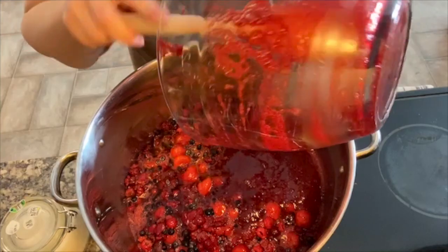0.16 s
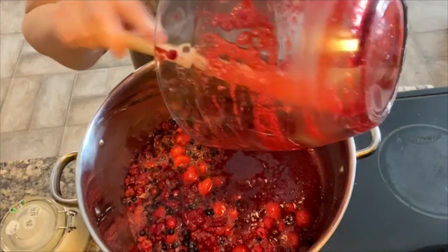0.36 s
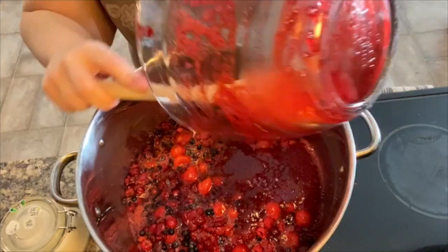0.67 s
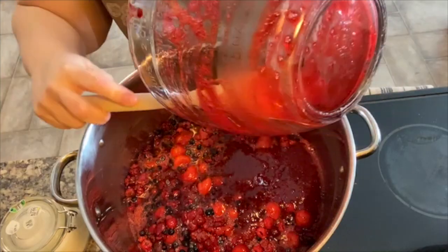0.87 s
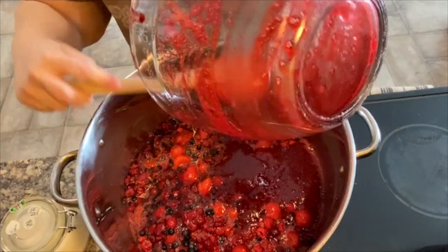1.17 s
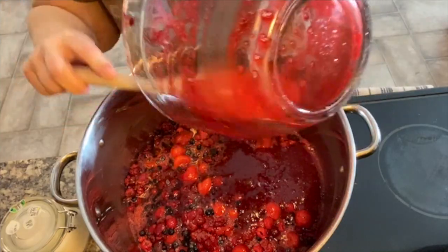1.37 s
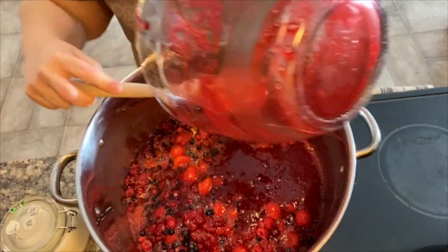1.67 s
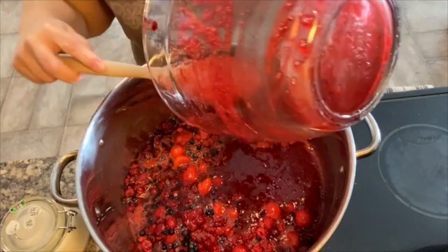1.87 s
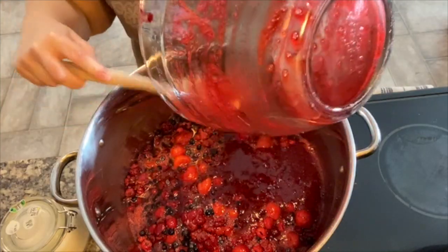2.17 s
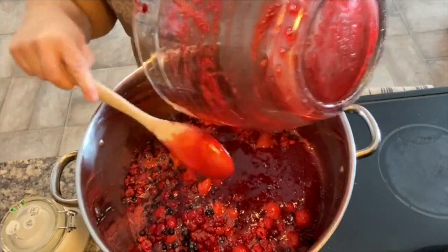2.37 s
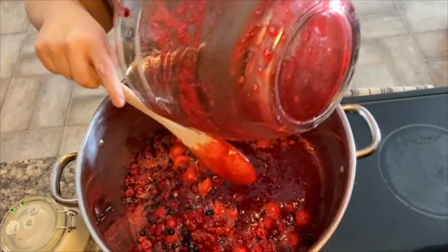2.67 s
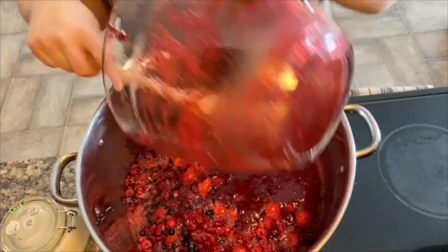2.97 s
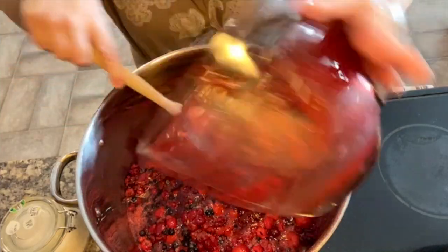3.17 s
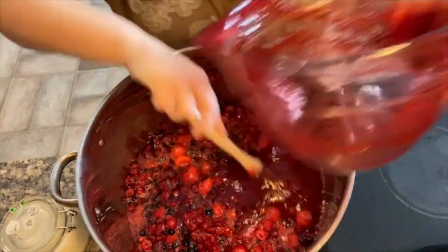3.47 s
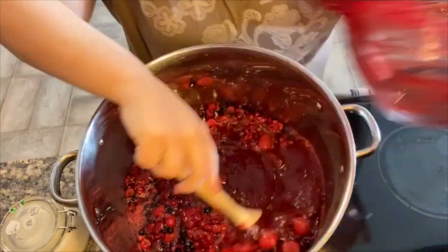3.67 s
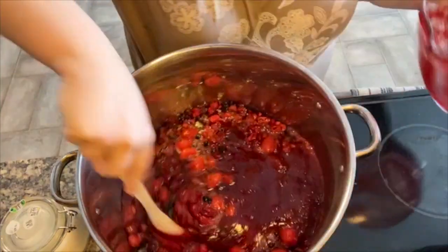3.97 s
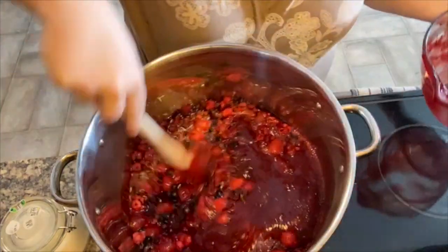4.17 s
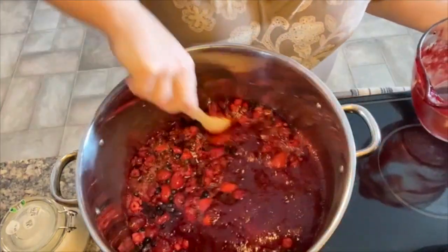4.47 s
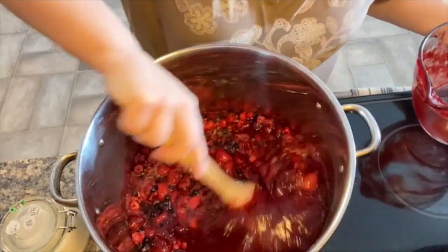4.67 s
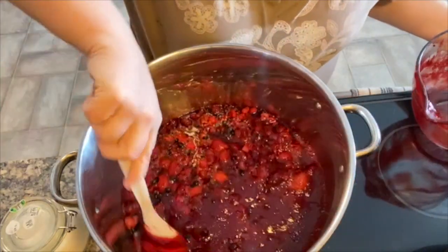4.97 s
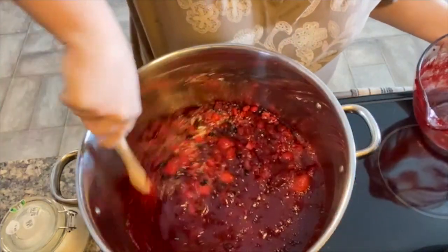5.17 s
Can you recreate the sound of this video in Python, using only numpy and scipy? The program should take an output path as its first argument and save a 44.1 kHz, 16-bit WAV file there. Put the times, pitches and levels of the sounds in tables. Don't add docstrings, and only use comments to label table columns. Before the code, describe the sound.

In a home kitchen with a low fridge hum and soft air noise, a wooden spoon scrapes a glass bowl in short jerky squeaks and knocks it sharply, loudest early on. Lighter rim knocks follow, then a short pause before the spoon enters a full steel pot, sweeping and thudding dully through wet fruit. Close stereo microphone, faint room echo.

```python
import sys
import numpy as np
from scipy import signal
from scipy.io import wavfile

SR = 44100
rng = np.random.default_rng(int(sys.argv[2]) if len(sys.argv) > 2 else 0)


def volts_from_decibels(level):
    exponent = np.asarray(level, float) / 20
    return 10 ** exponent


def transcribe(u):
    v = np.clip(np.atleast_2d(u).T, -1, 1)
    q = np.round(v * 32767).astype(np.int16)
    wavfile.write(sys.argv[1], SR, q)


N = 235048

# pitch_hz, level_db (per Hz)
AIR_COLOUR = [(15, -42), (30, -14), (55, -3), (90, 1), (150, -8.5), (290, -11), (400, -25.5), (600, -13.5),
              (730, -14.5), (1350, -22), (1700, -25), (2700, -25.5), (4500, -58), (9000, -43), (16000, -61)]
# pitch_hz, width_hz, level_db
FRIDGE_FAN = [(139, 22, -67.5), (543.4, 80, -62), (619.8, 23, -60.5), (1322, 230, -68)]
# pitch_hz, level_db (rms)
FRIDGE_MOTOR = [(60, -68), (118.6, -51.5)]
# pitch_hz, likeness (-1 to 1)
PORT_LIKENESS = [(60, 0.66), (180, 1), (530, -0.68), (1590, -0.23), (4730, -0.084), (14100, 0.49)]
# pitch_hz, level_db
PORT_LEANING = [(60, -1.5), (180, 5), (530, 1), (1590, -1), (4730, -2), (14100, 0.5)]
# pitch_hz, t60_s
ECHO_DECAY = [(150, 0.17), (600, 0.39), (2000, 0.37), (5000, 0.41), (12000, 0.14)]
# low_hz, high_hz
DEAF_BAND = [9750, 11050]
# pitch_hz, level_db (per Hz)
RUSTLE_SPECTRUM = [(900, -17), (2000, 11.5), (3500, 1.5), (5500, 3), (8000, -5.5), (12000, 7.5),
                   (15000, -15)]
# start_s, length_s, level_db
PULP_STROKES = [(0.0, 0.0095, -73), (0.263, 0.32, -79), (0.734, 0.11, -84), (1.017, 0.026, -82.5),
                (1.461, 0.23, -83), (2.057, 0.08, -89), (2.26, 0.03, -78), (2.946, 0.032, -79.5),
                (3.15, 0.064, -97), (3.31, 0.43, -73.5), (3.903, 0.32, -72), (4.45, 0.11, -74.5),
                (4.738, 0.29, -75.5), (5.123, 0.25, -73)]
# start_s, peak_db, pitch_hz
PULP_TICKS = [(0.0488, -49, 8300), (0.2137, -21, 9000), (0.647, -52.5, 4100), (1.078, -54, 2800),
              (1.2353, -55, 8360), (1.584, -60, 7430), (1.6013, -62, 3510), (1.919, -56.5, 8590),
              (1.9622, -49.5, 8000), (1.9807, -42.5, 10100), (2.0271, -33, 8700), (2.607, -52.5, 7700),
              (3.1143, -58.5, 13600), (3.6771, -38.5, 3500), (3.7278, -45.5, 4300), (4.251, -58, 3440),
              (4.6014, -54.5, 12100), (4.6394, -58, 8430), (4.7308, -40.5, 8200), (4.828, -59, 4900),
              (4.954, -38, 7920), (5.0574, -55, 5450), (5.0946, -46, 12100), (5.1152, -48.5, 8250),
              (5.181, -37, 8000), (5.299, -49, 7860)]
# start_s, peak_db, pitch_hz
PULP_PEELS = [
    (0.1462, -45, 7000),
    (1.739, -59.5, 8000),
    (2.2083, -55, 6800),
    (3.293, -48, 7420),
    (3.3478, -53, 3520),
    (4.4166, -55, 3640),
]
# start_s, peak_db, pitch_hz
WOOD_TAPS = [(0.147, -65, 1500), (1.601, -38, 1700), (1.641, -40, 2600), (1.66, -39.5, 2460),
             (1.994, -40, 1840), (4.456, -33, 2200), (4.512, -39, 1830), (4.774, -34.5, 1490),
             (4.901, -36, 1410), (4.954, -49, 2600), (5.216, -27, 1500)]
# start_s, length_s, level_db
POT_SWEEPS = [
    (3.451, 0.21, -58.5),
    (3.958, 0.24, -61.5),
]
# start_hz, end_hz, width_hz, level_db
SWEEP_VOICES = [
    [(2167, 1950, 210, 1), (1643, 1850, 70, -3.5), (3100, 2950, 96, -7.5), (2600, 2600, 62, -12),
     (4300, 4300, 300, -12)],
    [(1640, 1540, 110, -1.5), (2200, 2250, 117, -3), (3400, 3600, 47, -13), (3060, 2200, 110, -25)],
]
# start_s, held_s, level_db
GLASS_JERKS = [
    (0.005, 0.02, -52),
    (0.078, 0.01, -66),
    (0.585, 0.03, -49),
    (0.73, 0.02, -58),
    (0.79, 0.02, -61),
    (0.84, 0.04, -65),
    (0.92, 0.03, -67),
    (1.44, 0.085, -45),
    (1.55, 0.01, -57),
]
# start_s, peak_db, boom_db, wall_db
POT_BLOWS = [(3.394, -25.5, -10, -14), (3.401, -17, -9, -14), (3.411, -35, -9, -14),
             (3.674, -34.5, -8.5, -18), (4.456, -17.5, -3.5, -5.5), (4.464, -31, 0, -38),
             (4.51, -36.5, 7.5, -14.5), (4.729, -41, -5, -10), (4.772, -41, -16, -18),
             (4.899, -29.5, 1, -5.5), (5.217, -20.5, -7, -10), (5.251, -43.5, 2, 6)]
# pitch_hz, level_db
POT_WOOD = [(340, -0.5), (520, 1), (640, -2), (800, 0.5), (1020, -3.5), (1350, -5)]
# pitch_hz, level_db, t60_s
POT_LOW = [(135, -20, 0.69), (191, -6, 0.34), (252, 6, 0.043), (251, -1, 0.063), (299.6, -9.5, 0.22)]
# pitch_hz, level_db, t60_s
POT_SIDE = [(435, 5.5, 0.099), (474, -2.5, 0.17), (771, 0.5, 0.069)]
# pitch_hz, level_db, t60_s
GLASS_DEEP = [(594.7, 2.5, 0.15), (623.8, -2, 0.21), (854, -19.5, 0.22)]
# pitch_hz, level_db, t60_s
GLASS_UPPER = [(1501, -1, .3), (1514, -14, .25), (1825, -20, .2), (2260, -24, .2), (2650, -19, .2),
               (3670, -22, .1), (4200, -24, .08), (4700, -24, .09)]
# pitch_hz, level_db, t60_s
GLASS_GRIPPED = [(1239, -9, 0.62), (1250, -42, 0.7), (1333, -11.5, 0.59), (1400, -19, 0.58),
                 (1477, -3.5, 0.2), (1760, -5.5, 0.43), (1955, -49, 0.15), (2200, -12, 0.35),
                 (2430, -12, 0.19), (2600, -11, .36)]
# start_s, spoon_peak_db, deep_ring_db, upper_ring_db
WALL_BLOWS = [
    (0.147, -52, 7.5, -28.5),
    (0.216, -15.5, -16, -36),
    (0.219, -12.5, -10.5, -34),
    (0.243, -39, 9.5, -30),
]
SECOND_BLOWS = [
    (0.436, -16, 1, -29.5),
    (0.445, -10.5, -14, -22),
    (1.005, -44.5, -5, -14),
    (1.079, -51, -14, -19),
]
HARD_BLOW = [
    (1.353, -20, -13, -13.5),
    (1.359, 4, -18.5, -26.5),
    (1.382, -10, -20.5, -20.5),
    (1.391, -18, -10.5, -16.5),
    (1.405, -22.5, -16, -15.5),
]
DRY_BLOWS = [
    (1.634, -25.5, -10.5, -24.5),
    (2.703, -20.5, -9.5, -41.5),
    (2.708, -24, -6, -36.5),
]
RIM_BLOWS = [
    (1.9988, -38, 2, -30),
    (2.0068, -12, -5, -11),
    (2.0288, -24, 1, -30),
    (2.0448, -15, -6, -10),
]
LIGHT_BLOWS = [
    (2.4630, -25, -10, -13),
    (2.4897, -42, 9, 4),
]
# pitch_hz, level_db
WALL_SPOON = [(270, -6.5), (880, -4.5), (1340, 5), (1600, -7), (2190, 2), (2730, -0.5), (3280, -15),
              (4890, -1), (5800, -12), (7900, -1.5)]
SECOND_SPOON = [(450, -13), (760, -8.5), (1180, -8), (1390, 4), (2050, -6), (2800, -7.5), (3140, -5.5),
                (3770, -8.5), (4900, -51), (6600, -16.5)]
HARD_SPOON = [(260, -29), (1240, -7.5), (1370, -11), (1455, 0), (1570, -5), (1740, -64), (1950, -5),
              (2420, -9), (2620, -13), (3350, -16), (4400, -27), (5750, -18.5)]
DRY_SPOON = [(800, -8), (1030, -12.5), (1300, -3.5), (2150, -10.5), (2450, -8.5), (2800, -6), (4150, -16.5)]
RIM_SPOON = [(790, -12), (1020, -22), (1400, 6.5), (1820, 0), (2200, -8.5), (2800, -9), (3680, -17.5),
             (4200, -22)]
LIGHT_SPOON = [(470, -29), (770, -6.5), (1030, -28.5), (1250, 2), (1420, 5.5), (2150, -9.5), (2750, -4),
               (3680, -14.5), (4150, -40)]


def rms_one(x):
    return x / np.sqrt(np.mean(x ** 2) + 1e-20)


def at_hz(points, hz):
    points = np.array(points)
    return np.interp(np.log(hz), np.log(points[:, 0]), points[:, 1])


def leaning_db(hz):
    return at_hz(PORT_LEANING, hz) / 2 * np.array([[1], [-1]])


def in_time(start_s, length_s, db, rise_db_per_s, fall_db_per_s):
    t = np.arange(N) / SR - start_s
    slopes = np.minimum(rise_db_per_s * t, fall_db_per_s * (length_s - t))
    return volts_from_decibels(db + np.minimum(0, slopes))


def drift(rate_hz):
    r = np.exp(-80 * np.pi * rate_hz / SR)
    white = rng.standard_normal(N // 40 + 2002)
    slow = signal.lfilter([1], [1, -2 * r, r * r], white)[2000:]
    return np.interp(np.arange(N) / 40, np.arange(len(slow)), rms_one(slow))


def ring(clicks, hz, t60):
    r = volts_from_decibels(-60 / (t60 * SR))
    w = 2 * np.pi * hz / SR
    return signal.lfilter([0, np.sin(w)], [1, -2 * r * np.cos(w), r * r], clicks + 1e-18)


def band(x, low_hz, high_hz):
    edges = [low_hz, min(high_hz, .46 * SR)]
    return signal.sosfilt(signal.butter(2, edges, "band", fs=SR, output="sos"), x)


def half_octaves():
    edges = 22 * 2 ** np.arange(0, 10, .5)
    return zip(edges, edges[1:], np.sqrt(edges[1:] * edges[:-1]))


def banded_noise(spectrum, patchy_db):
    out, white = 0, rng.standard_normal((2, 2, N))
    for k, (low, high, hz) in enumerate(half_octaves()):
        mid, side = band(white[k % 2], low, high)
        alike = np.clip(at_hz(PORT_LIKENESS, hz), -1, 1)
        pair = np.sqrt(1 + alike) * mid + np.sqrt(1 - alike) * side * [[1], [-1]]
        level_db = at_hz(spectrum, hz) + leaning_db(hz) + patchy_db * drift(13.0)
        out = out + volts_from_decibels(level_db) * pair
    return rms_one(out)


def burst(peak_db, t60):
    return volts_from_decibels(peak_db - 60 * np.arange(4000) / SR / t60) * rng.standard_normal(4000)


def add(track, s, sound):
    at = round(s * SR)
    track[at:at + len(sound)] += sound[:N - at]


def ports(x):
    return np.array([np.roll(x, 1), x])


def deaf(x):
    return signal.sosfilt(signal.cheby2(5, 40, DEAF_BAND, "bandstop", fs=SR, output="sos"), x)


def kitchen_air():
    return volts_from_decibels(-55.5) * banded_noise(AIR_COLOUR, patchy_db=3.5)


def fridge_hum():
    lean = volts_from_decibels(1.16 * np.array([[1], [-1]]))
    turns = np.arange(N) / SR * 2 * np.pi
    out = 0
    for hz, db in FRIDGE_MOTOR:
        strength = np.sqrt(2) * volts_from_decibels(db + 1.3 * drift(2.2))
        out = out + strength * np.sin(hz * turns + .5 * drift(0.62))
    return lean * out


def fridge_fan():
    out = 0
    for hz, width_hz, db in FRIDGE_FAN:
        common, own = rng.standard_normal(N), rng.standard_normal((2, N))
        alike = np.clip(at_hz(PORT_LIKENESS, hz), 0, 1)
        noise = np.sqrt(alike) * common + np.sqrt(1 - alike) * own
        t60 = np.log(1000) / (np.pi * width_hz)
        rung = ring(ring(noise, hz, t60), hz, t60 / 2)
        out = out + volts_from_decibels(db + leaning_db(hz)) * rms_one(rung)
    return out


def kitchen_echo(x):
    t, white = np.arange(SR // 2) / SR, rng.standard_normal((2, 2, SR // 2))
    answer = 0
    for k, (low, high, hz) in enumerate(half_octaves()):
        answer = answer + band(white[k % 2], low, high) * volts_from_decibels(-60 * t / at_hz(ECHO_DECAY, hz))
    answer = answer * np.clip(t / 0.0043, 0, 1)
    return signal.fftconvolve(x, answer / np.linalg.norm(answer[0]), axes=1)[:, :N]


def pulp_rustle():
    grain = volts_from_decibels(1.24 * drift(150))
    effort = volts_from_decibels(-97)
    for stroke in PULP_STROKES:
        effort = effort + in_time(*stroke, rise_db_per_s=167, fall_db_per_s=159)
    return effort * volts_from_decibels(12.5) * grain * banded_noise(RUSTLE_SPECTRUM, patchy_db=-3.5)


def pulp_ticks():
    tick_t60_s, peel_t60_s = .05, 0.2
    out, wide = np.zeros(N), 1.3
    events = [(*row, tick_t60_s) for row in PULP_TICKS] + [(*row, peel_t60_s) for row in PULP_PEELS]
    for s, db, hz, t60 in events:
        spit = burst(db - 6.5, np.clip(t60, .005, .3)) + burst(db + 0.5, 0.0036)
        body = band(spit, hz / wide, hz * wide)
        middle = volts_from_decibels(-1) * band(spit, 1700, 6700)
        treble = volts_from_decibels(2.5) * band(spit, 7630, 19200)
        add(out, s, body + middle + treble)
    return out


def wood_taps():
    out = np.zeros(N)
    for s, db, hz in WOOD_TAPS:
        add(out, s, band(burst(db - 0.5, t60=0.058), hz / 1.3, hz * 1.19))
    return out


def pot_sweeps():
    out = 0
    for (start_s, length_s, db), voices in zip(POT_SWEEPS, SWEEP_VOICES):
        along = np.clip((np.arange(N) / SR - start_s) / length_s, -1, 1)
        sung = 0
        for start_hz, end_hz, width_hz, band_db in voices:
            turns = 2 * np.pi * np.cumsum(start_hz + (end_hz - start_hz) * along) / SR
            rough = drift(width_hz) * np.cos(turns) + drift(width_hz) * np.sin(turns)
            sung = sung + volts_from_decibels(band_db) * rough
        out = out + in_time(start_s, length_s, db, rise_db_per_s=87.3, fall_db_per_s=230) * sung
    return out * volts_from_decibels(2.3 * drift(30))


def glass_rubbing():
    slips_per_s = 2500
    slips = rng.standard_normal(N) * (rng.random(N) < slips_per_s / SR) * volts_from_decibels(0.61 * drift(18.2))
    effort = sum(in_time(*row, rise_db_per_s=349.5, fall_db_per_s=601) for row in GLASS_JERKS)
    sung = ring(slips, 1312, 0.12) + ring(slips, 1390, 0.12) + volts_from_decibels(-12) * ring(slips, 1900, .02)
    return effort * rms_one(sung)


def damped(modes, cycles, longest_s=0.056):
    return [(hz, db, min(cycles / hz, longest_s)) for hz, db in modes]


def cracks(blows, crack_db, crack_hz, t60):
    out = np.zeros(N)
    for s, db in blows[:, :2]:
        spit = burst(db + crack_db + 2.5, t60)
        rattle = band(band(burst(db + crack_db + 4.5, t60=.13), 600, 3700), 480, 4000)
        add(out, s, band(spit, crack_hz, 8030) + volts_from_decibels(-10.5) * band(spit, 6500, 21000) + rattle)
    return out


def knocks(blows, *bodies, crack_db, pan_db, swell_s=.004, crack_hz=1200, crack_t60=.03):
    blows, out = np.array(blows), np.zeros((2, N))
    s, peak_db = blows[:, 0], blows[:, 1]
    pan = volts_from_decibels([pan_db / 2, -pan_db / 2])
    heard = slice(int(s[0] * SR), int((s[-1] + .7) * SR))
    shares_db = [0 * s, blows[:, 2], blows[:, 3]]
    swell_gain = 2 * np.log(1000) / (swell_s * SR)
    for modes, share_db in zip(bodies, shares_db):
        for hz, mode_db, t60 in modes:
            clicks = np.zeros((2, N))
            size = volts_from_decibels(peak_db + share_db + mode_db - 7)
            start = s + .0012 * rng.random()
            left_lag_s = .16 / hz * (.5 + rng.random())
            for port, lag_s in enumerate([left_lag_s, 0]):
                np.add.at(clicks[port], ((start + lag_s) * SR).astype(int), size * pan[port])
            out[:, heard] += ring(ring(clicks[:, heard], hz, t60), hz, swell_s) * swell_gain
    return out + ports(cracks(blows, crack_db, crack_hz, crack_t60))


def pot_thuds():
    return knocks(POT_BLOWS, damped(POT_WOOD, 13.8), POT_LOW, POT_SIDE, crack_db=-34, pan_db=1.4,
                  swell_s=0.014, crack_hz=900, crack_t60=0.047)


def glass(blows, spoon, cycles, crack_db, crack_t60, pan_db, upper=GLASS_UPPER):
    return knocks(blows, damped(spoon, cycles), GLASS_DEEP, upper,
                  crack_db=crack_db, pan_db=pan_db, crack_t60=crack_t60)


def bowl_knocks():
    return (glass(WALL_BLOWS, WALL_SPOON, cycles=53.2, crack_db=-11.5, crack_t60=0.065, pan_db=1.0)
            + glass(SECOND_BLOWS, SECOND_SPOON, cycles=38, crack_db=-22.5, crack_t60=0.023, pan_db=3.0)
            + glass(HARD_BLOW, HARD_SPOON, cycles=45, crack_db=-30.5, crack_t60=0.053, pan_db=1.8,
                    upper=GLASS_GRIPPED)
            + glass(DRY_BLOWS, DRY_SPOON, cycles=28.5, crack_db=-32, crack_t60=.073, pan_db=1.5)
            + glass(RIM_BLOWS, RIM_SPOON, cycles=22.7, crack_db=-36.5, crack_t60=0.096, pan_db=3.0)
            + glass(LIGHT_BLOWS, LIGHT_SPOON, cycles=41.0, crack_db=-27.5, crack_t60=0.063, pan_db=2.5))


def scene():
    near = band(bowl_knocks(), 185, 23000) + band(pot_thuds(), 49, 4500)
    near = near + ports(wood_taps() + glass_rubbing() + pot_sweeps())
    wet = ports(pulp_ticks())
    near = near + volts_from_decibels(-7) * wet + deaf(wet)
    faint = volts_from_decibels(-15) * kitchen_echo(near) + pulp_rustle() + kitchen_air()
    return near + deaf(faint) + fridge_fan() + fridge_hum()


def band_limit(x):
    return signal.sosfilt(signal.butter(12, 14680, fs=SR, output="sos"), x)


def record(dry):
    rounded = 1.5 * np.tanh(dry / 1.5)
    mix = signal.sosfilt(signal.cheby2(10, 60, 15300, fs=SR, output="sos"), rounded)
    return band_limit(mix)


dry = scene()
out = record(dry)
transcribe(out)
```